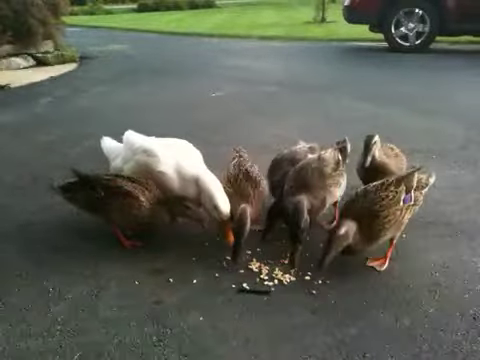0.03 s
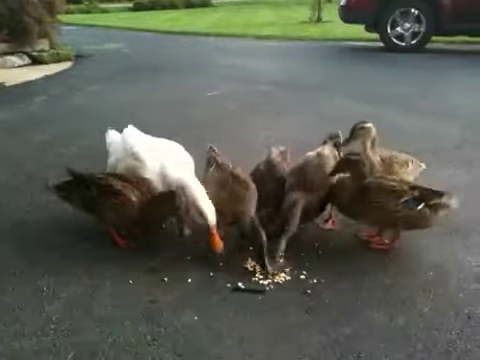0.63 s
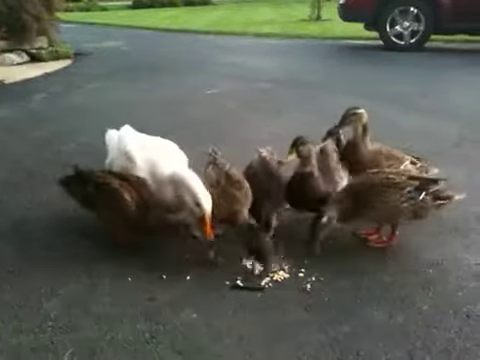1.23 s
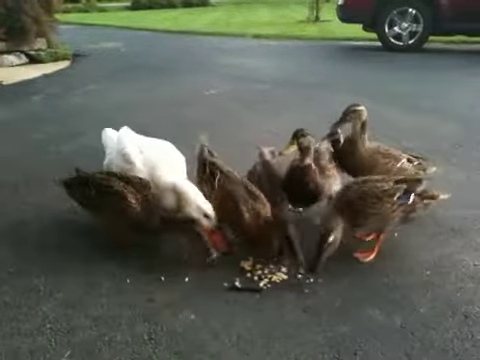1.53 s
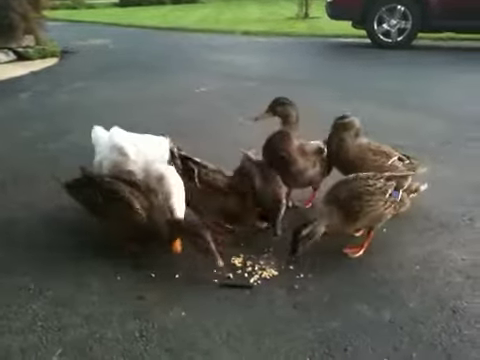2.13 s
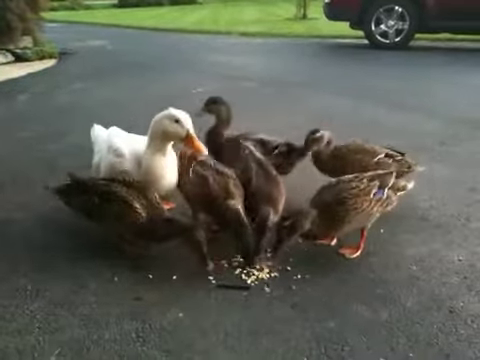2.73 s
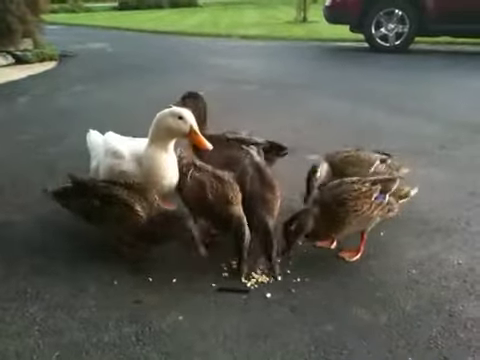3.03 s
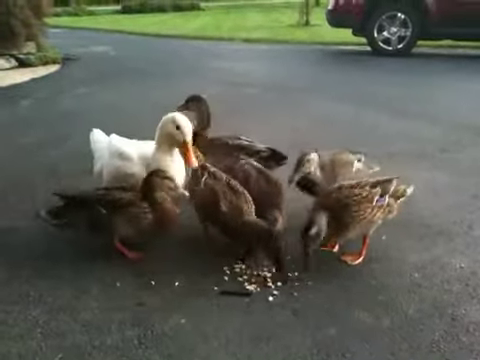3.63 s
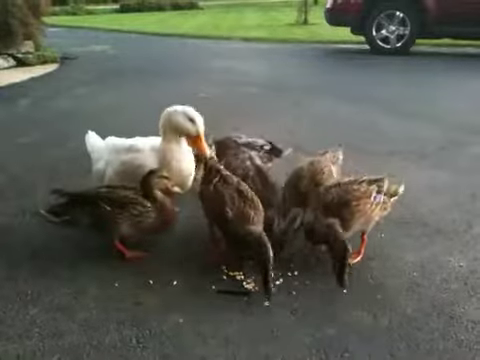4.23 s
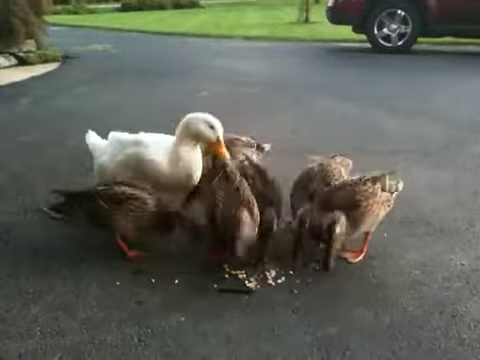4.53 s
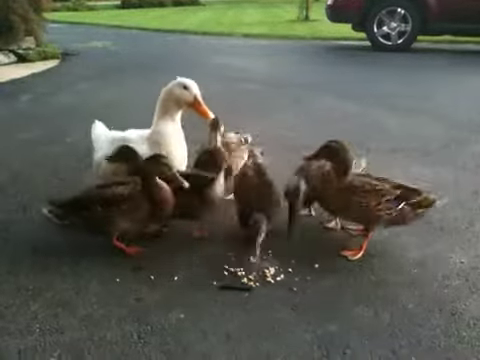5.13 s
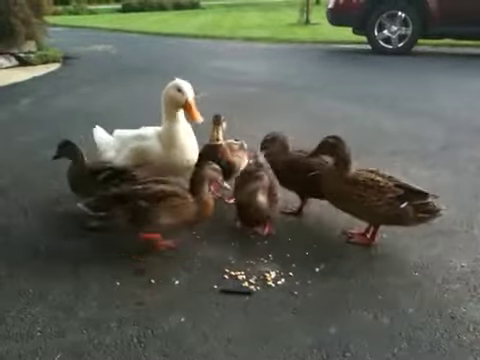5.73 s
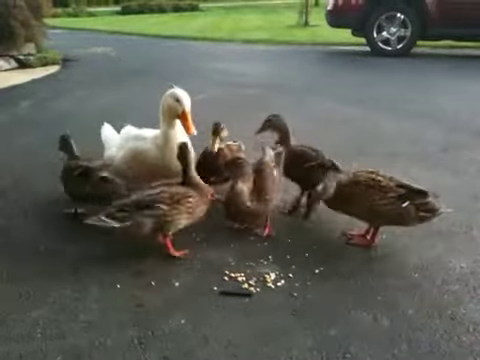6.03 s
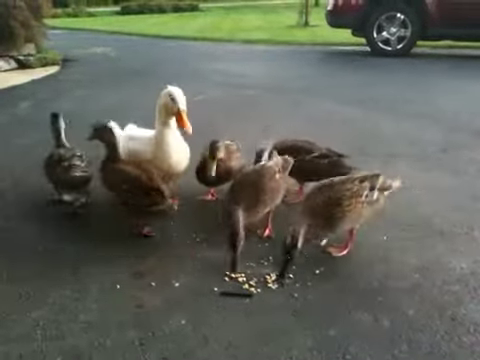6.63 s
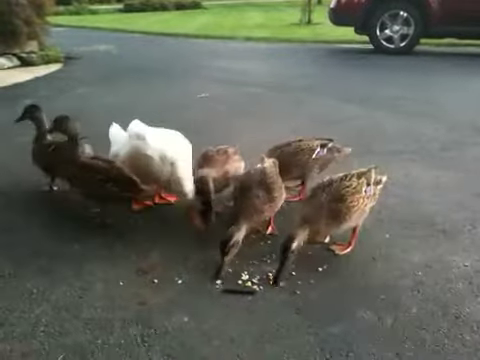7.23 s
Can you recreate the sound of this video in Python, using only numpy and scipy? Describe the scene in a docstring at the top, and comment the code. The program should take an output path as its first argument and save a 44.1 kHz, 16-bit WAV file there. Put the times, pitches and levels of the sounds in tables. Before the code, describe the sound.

Ducks peck at corn on pavement with short quacks and thin squeals, while a cricket chirps over a soft outdoor hum.

```python
"""On an asphalt driveway, young ducks crowd round corn a couple of metres away. Their voices are
breaking: the membranes of the syrinx whistle when taut and beat in pulses when slack, so a call slips
from a grunt through a thin squeal into a quack, shaped by the resonances of the throat. Impacts make
bills tick and clap, kernels skitter and grit crackle, and feathers rustle. A cricket chirps by
stridulation, and near the end a far engine picks up speed over quiet traffic."""
import sys
import numpy as np
from scipy import signal
from scipy.fft import rfft, irfft
from scipy.io import wavfile
from scipy.ndimage import map_coordinates

SR = 44100
rng = np.random.default_rng(int(sys.argv[2]) if len(sys.argv) > 2 else 0)


def file_out(sig):
    """Save sig as 16-bit WAV at sys.argv[1]."""
    # one column per channel
    cols = np.atleast_2d(sig).T
    # limit, then scale
    lim = np.clip(cols, -1, 1)
    pcm = np.round(lim * 32767).astype(np.int16)
    wavfile.write(sys.argv[1], SR, pcm)


N = 326340
T = np.arange(N) / SR

# Levels in the tables are relative; each source applies its own gain.
# Spectrum of the open air: f/Hz, density/dB
AIR_SPECTRUM = [(18, -79), (30, -39), (80, -11), (127, 0), (290, -10), (420, -19), (698, -16), (883, -19.5),
                (1210, -16.5), (2800, -25), (4040, -24.5), (5680, -18), (11200, -32.5), (14600, -25.5),
                (15800, -22)]
# Swell of distant traffic: t/s, level/dB
TRAFFIC_SWELL = [(0, -60), (1.2, -75.5), (2.2, -87), (3.7, -68), (4.3, -66), (5.2, -65.5), (5.8, -61),
                 (6.6, -67.5), (7.4, -72)]
# Vigour of the flock's feeding: t/s, level/dB
FEEDING_VIGOUR = [(0, 4.5), (.6, 6.5), (1.45, -2.5), (2, 1), (2.6, 6), (4.2, -2), (4.7, 5), (5.3, -0.5),
                  (5.7, -5), (6.5, -1), (7.4, 2.5)]
# Modes of a bill: f/Hz, bandwidth/Hz, gain/dB
BILL_MODES = [(1510, 4700, -16), (3200, 880, -3), (4300, 990, 4), (6110, 1680, -1), (7110, 500, 0.5)]
# Pulse trains: t/s, length/s, first rate/Hz, last rate/Hz, level/dB, fade/dB, step per lead-in pulse/dB,
# step per trailing pulse/dB, bill opening (0-1), formant scale, pinch gain/dB, edge gain/dB
QUACK_TRAINS = [(.0062, 0.0036, 231, 180, -29.5, -22, -9, -30, 0.65, 0.88, -2, -11),
                (0.118, 0.013, 249, 240, -26.5, -3.5, -11, -27, 0.3, 1.02, -3, -2),
                (0.397, 0.011, 174.3, 200, -27.5, -2, -41, -28, 0.53, 0.91, 1, -10),
                (2.5614, 0.014, 227.7, 231, -32.5, -6, -3.5, -14, 0.22, 0.99, -0.5, 3),
                (3.8348, 0.0097, 200.7, 195, -29.5, -2, -9, -19, 0.77, 0.99, 2, 1),
                (5.2088, 0.023, 132.5, 32.2, -26.5, -4.5, -6, -40, 0.87, 0.94, -5, -3.5),
                (5.4512, 0.023, 182, 172.7, -30.5, -3.5, -4.5, -0.5, 0.51, 0.997, 15, -11),
                (6.03, 0.016, 82.5, 71.6, -16, -7.5, -6.5, -5.5, 0.86, 0.98, 2, -1),
                (6.1887, 0.021, 227.2, 249.3, -14, 0, -3.5, -3.5, 0.87, 0.95, 2, 1.5),
                (6.3633, 0.043, 160.2, 62.6, -14.5, -18, -8.5, -16, 0.86, 0.993, 2, 6.5)]
# Very short pulse trains as the syrinx opens or shuts: t/s, level/dB, bill opening (0-1), formant scale
GRUNT_TRAINS = [(.06, -39, 0.46, 1), (0.8205, -35, .3, 0.97), (2.833, -45.5, 0.53, 0.59),
                (2.983, -39, 0, 0.95), (3.618, -35, 0.56, 0.99), (4.558, -38.5, 0.2, 0.97),
                (4.807, -44, 0.58, 0.52), (5.029, -38.5, 0.48, 1.1), (5.8233, -34, 0.55, 0.86)]
# Throat resonances with the bill shut, with it open, and for hissing: f/Hz, bandwidth/Hz, gain/dB
SHUT_FORMANTS = [(285, 56, 12), (799, 106, 6.5), (1150, 47, 3.5), (1970, 360, -0.5), (4830, 1330, -6.5)]
OPEN_FORMANTS = [(195, 39, 3.5), (620, 130, -13.5), (1246, 210, 11.5), (1380, 230, 10.5), (1600, 106, 2.5),
                 (1796, 110, 2.5), (3100, 250, -11), (3600, 260, -11), (4400, 250, -7.5), (5280, 290, -13),
                 (7100, 630, -36)]
HISS_FORMANTS = [(328, 200, 4), (1320, 460, 3), (1700, 460, 8.5), (2170, 270, 8), (2660, 280, 4.5),
                 (3420, 210, 4), (3770, 170, -3.5), (4400, 280, -1), (5670, 1500, 0)]
# Overtones of the whistling syrinx: harmonic number, level/dB
WHISTLE_OVERTONES = [(2, 3), (3, -13), (4, -14)]
# Falls of the breaking voice: t/s, length/s, first f/Hz, last f/Hz, level/dB
VOICE_BREAKS = [(0.097, 0.015, 1150, 748, -43), (0.554, 0.025, 1740, 1400, -56),
                (0.992, 0.02, 1045, 733, -46.5), (3.814, 0.019, 1420, 904, -55),
                (4.638, 0.019, 1057, 683, -45.5), (5.188, 0.013, 1480, 1075, -46),
                (6.007, 0.013, 1690, 890, -40), (6.167, 0.011, 1420, 900, -32.5),
                (6.346, 0.014, 1376, 822, -36.5)]
# Cricket chirps: t/s, level/dB
CRICKET_CHIRPS = [(.116, 8.5), (.728, 9), (2.445, 7), (2.853, 8), (3.521, 7.5), (3.919, 8), (4.467, 7.5),
                  (4.859, 9), (5.683, 7.5), (7.058, 7)]
# Wing strokes within a chirp: delay/s, level/dB
WING_STROKES = [(0, -8.5), (.037, -5), (.077, -6), (.12, -17.5)]
# The hardest pecks: t/s, level/dB, ring f/Hz, treble/dB
PECK_IMPACTS = [(0.194, -41, 4300, -33), (0.326, -49.5, 4000, -20), (0.388, -47, 3900, -7),
                (0.504, -49, 4400, -20), (.514, -44.5, 4000, 6), (0.56, -47, 3400, -20),
                (0.573, -39, 5200, -16), (0.6537, -41, 4060, -6), (.753, -47.5, 4200, -27),
                (0.992, -45.5, 3720, -14), (1.115, -46.5, 4540, -22), (1.139, -54, 4400, -20),
                (1.181, -50, 7900, 3), (1.2893, -55, 6400, 7), (1.3225, -50, 3870, -10),
                (1.342, -62, 5240, -12), (1.37, -54, 8980, 3), (1.3832, -52, 4340, -14),
                (1.3978, -46.5, 4240, -3), (1.42, -49, 5030, -14), (1.44, -51, 5700, -20),
                (1.4708, -55, 4680, -14), (1.482, -54, 4400, -5), (1.597, -64, 4020, -14),
                (1.6463, -53.5, 4400, -14), (1.685, -53, 4300, -15), (1.7405, -49.5, 4500, -28),
                (1.801, -52, 5970, -4), (1.836, -50.5, 4800, -10), (1.9138, -52, 4530, -6),
                (1.947, -53, 4390, -14), (1.988, -43, 3800, -29), (1.993, -47, 4760, -14),
                (2.001, -47.5, 7040, -1), (2.06, -48, 8000, 20), (2.088, -49, 4230, -20),
                (2.242, -50.5, 4030, -25), (2.2999, -58, 4680, -5), (2.326, -52, 4300, -2),
                (2.38, -48, 4700, -9), (2.4886, -40, 4530, -18), (2.537, -46.5, 5000, 5),
                (2.9111, -44.5, 5600, -10), (2.957, -45, 4200, -19), (2.9696, -40, 5130, -5),
                (3.0528, -47, 4760, -6), (3.1991, -46, 4000, -18), (3.242, -49, 4500, 3),
                (3.3481, -43.5, 4630, -4), (3.607, -47, 4830, -22), (3.841, -49, 4200, -21),
                (3.856, -42, 4700, -9), (3.873, -45.5, 4800, -9), (4.061, -52, 4200, -22),
                (4.085, -46, 4700, 10), (4.1758, -47.5, 4850, -16), (4.333, -51, 4800, -7),
                (4.398, -59, 3900, -20), (4.4068, -37, 7100, -33), (4.423, -49, 4960, -27),
                (4.4618, -42.5, 4900, -30), (4.498, -44.5, 4500, -27), (4.5586, -53, 5050, -12),
                (4.64, -42, 4130, -6), (4.686, -48, 5950, -19), (4.747, -55, 3600, -18),
                (4.771, -44, 5100, -14), (4.8094, -46.5, 5770, 4), (5.029, -47, 4800, 2),
                (5.343, -48, 5600, 2), (5.4903, -48.5, 4100, -6), (6.616, -48.5, 5700, -7),
                (6.8056, -41.5, 4900, -10), (6.881, -52, 4900, -18), (6.967, -50, 4600, -18),
                (7.035, -48, 4240, -20), (7.2649, -42.5, 4120, -15)]
# Arching whistles: t/s, length/s, first f/Hz, crest f/Hz, place of crest (0-1), level/dB, overtones/dB,
# breath/dB. The two sides of the syrinx may sound at once.
SQUEAL_NOTES = [(0.434, 0.13, 1600, 1890, 0.7, -48.5, -12, -33),
                (0.468, 0.094, 1657, 1725, 0.25, -63, 14, -20),
                (0.831, 0.19, 1520, 1900, 0.66, -53.5, -2, -37),
                (0.85, .138, 1575, 1648, 0.58, -70.5, 21.5, -20),
                (2.337, 0.029, 755, 930, 0.7, -65, -14, -21), (2.423, 0.096, 650, 678, 0.58, -61, -2, -10),
                (2.533, 0.057, 727, 735, 0.34, -51, -8, -22),
                (2.855, 0.033, 990, 1136, .7, -54.5, -24, -20),
                (2.921, 0.041, 990, 1067, 0.6, -53.5, -17, -16),
                (3.639, 0.18, 1330, 1600, 0.84, -47, -14, -21),
                (3.689, 0.022, 2020, 2207, 0.7, -48.5, -4, -22),
                (3.761, 0.042, 2086, 2170, 0.62, -48, -13, -6.5),
                (5.042, 0.037, 1296, 1680, .8, -57, -20, -11),
                (5.111, 0.11, 1353, 1616, 0.64, -51, -22, -19),
                (5.845, 0.23, 1334, 1740, 0.73, -44, -12.5, -30),
                (5.946, 0.067, 1500, 1510, 1, -62, 12.5, -15),
                (6.152, 0.026, 1540, 1570, 0.7, -48, -13, -12),
                (6.233, 0.089, 3330, 3370, 0.9, -61, -30, -16),
                (6.255, 0.081, 2490, 2590, 0.7, -55.5, -30, -22)]
# A bill clapping shut on a kernel: t/s, level/dB, ring f/Hz
BILL_CLAPS = [(1.141, -47.5, 697), (1.211, -52, 716), (1.482, -48.5, 1260), (1.834, -50, 1860),
              (2.144, -52, 501), (2.319, -48, 765), (2.499, -47, 680), (3.994, -45.5, 870),
              (4.698, -46, 770)]
# Feathers brushing: middle t/s, length/s, level/dB
FEATHER_BRUSHES = [(1.926, 0.082, -66), (2.655, 0.09, -56), (2.77, 0.55, -67.5), (3.07, .12, -87)]
# Dipping whistles: t/s, length/s, rim f/Hz, bottom f/Hz, level/dB, overtones/dB, breath/dB,
# roughness (0-1)
YELP_NOTES = [(2.363, 0.066, 728, 615, -54, -5.5, -24, 0.07), (2.876, 0.049, 910, 670, -47, -5, -19, 0),
              (3.21, 0.044, 1197, 903, -53.5, 2, -9, 0.56), (3.676, 0.02, 2220, 1667, -37.5, -7, -31, 0),
              (4.6, 0.037, 1120, 744, -39.5, -13, -25, 0), (5.079, 0.042, 1425, 1210, -41.5, -7, -32, 0.07),
              (5.882, 0.054, 767, 667, -45.5, -19, -14, 0.77)]


def undb(db):
    """Amplitude ratio of a level in decibels."""
    return 10 ** (np.asarray(db) / 20)


def unit(x):
    """Normalisation to a standard deviation of 1."""
    return x / (np.std(x) + 1e-12)


def level_at(rows, t=T):
    """Linear interpolation of a table of times and levels."""
    return np.interp(t, *np.transpose(rows))


def progress(length):
    """A ramp from 0 to 1 over length seconds."""
    return np.linspace(0, 1, int(length * SR))


def walk(rate, size=N):
    """Random wander of spread near 1, turning rate times a second."""
    knots = rng.standard_normal(4096)
    return map_coordinates(knots, [np.arange(size) * rate / SR], order=1, mode="mirror")


def phase_of(hz):
    """Phase is the time integral of frequency."""
    return 2 * np.pi * np.cumsum(hz) / SR


def add(out, s, x):
    """Superposition of x on out from time s."""
    i = int(round(s * SR))
    a, b = max(i, 0), min(i + len(x), N)
    if b > a:
        out[a:b] += x[a - i:b - i]


def band(x, low_hz, high_hz):
    """Band-pass filtering with skirts of 12 dB an octave."""
    edges_hz = [low_hz, min(high_hz, SR / 2 - 1000)]
    return signal.sosfilt(signal.butter(2, edges_hz, "band", fs=SR, output="sos"), x)


def ring(x, modes, scale=1):
    """Parallel resonances (f/Hz, bandwidth/Hz, gain/dB) of alternating sign, as along a tube."""
    out = 0
    for k, (hz, width, db) in enumerate(modes):
        b, a = signal.iirpeak(min(hz * scale, SR / 2 - 1000), hz / width, fs=SR)
        out = out + (-1) ** k * undb(db) * signal.lfilter(b, a, x)
    return out


def emphasis(x, hz, width_hz, db):
    """Peaking filter: one band is lifted or lowered."""
    return x + (undb(db) - 1) * ring(x, [(hz, width_hz, 0)])


def throat_dip(x, hz=2660, width_hz=1900):
    """Antiresonance of the throat between its two groups of formants."""
    return signal.lfilter(*signal.iirnotch(hz, hz / width_hz, fs=SR), x)


def echoes(x, t60_s, onset_s, low_hz, high_hz):
    """Reverberation: scattering from house, cars and trees builds up, then decays exponentially."""
    t = T[:SR]
    envelope = undb(-60 * t / t60_s) * (1 - np.exp(-(t / onset_s) ** 2))
    tail = band(rng.standard_normal(SR), low_hz, high_hz) * envelope
    return signal.fftconvolve(x, tail / np.linalg.norm(tail))[:N]


def open_air(level_db=-59.5):
    """Broadband noise: the open air is a nearly steady hiss, strongest in the bass."""
    hz, db = np.transpose(AIR_SPECTRUM)
    bin_hz = np.arange(N // 2 + 1) * SR / N
    colour = undb(np.interp(np.log(bin_hz + 1), np.log(hz), db))
    air = unit(irfft(rfft(rng.standard_normal(N)) * colour, N))
    return air * undb(level_db + .5 * walk(2.28))


def traffic():
    """Narrow-band noise: distant traffic is a low drone that slowly ebbs and swells."""
    return unit(band(rng.standard_normal(N), 106, 121.6)) * undb(level_at(TRAFFIC_SWELL) - 2)


def nibbling(count=420, spread_db=3.5, base_db=-57.5, decay_s=.0006):
    """Impact excitation: bills and skittering kernels tick at random, each with its pitch and weight."""
    out, t = np.zeros(N), T[:SR // 80]
    for when, size, pitch, weight in rng.random((count, 4)):
        s = when * N / SR
        contact = rng.standard_normal(len(t)) * np.exp(-t / decay_s)
        modes = ring(contact, BILL_MODES) + ring(contact, [(3300 * 3 ** pitch, 900, 2)])
        crack = undb(-10) * pitch * band(contact, 2400, 10700)
        knock = 2 * weight ** 2 * ring(contact, [(1110, 5900, -9)])
        tick = modes + crack + knock
        db = base_db + level_at(FEEDING_VIGOUR, s) + spread_db * min(-np.log(1 - size), 2)
        add(out, s, undb(db) * tick / np.abs(tick).max())
    return out


def grit(base_db=-73.5, grains_per_s=450, spread_db=4, flurry_db=3):
    """Shot noise: crumbs and grit crackle under the bills in flurries, louder with busier feeding."""
    grains = (rng.random(N) < grains_per_s / SR) * rng.standard_normal(N)
    grains *= undb(spread_db * np.minimum(rng.exponential(size=N), 3))
    crackle = unit(band(grains, 3900, 8500)) + undb(-9) * unit(band(grains, 880, 1950))
    return crackle * undb(base_db + level_at(FEEDING_VIGOUR) + flurry_db * walk(35))


def pulse_train(length, first_hz, last_hz, fade_db, lead_db, trail_db, jitter, lead_s=.0046):
    """Pulsed oscillation (t/s, level/dB): two pulses lead in, the run changes pace, two trail off."""
    pulses, at = [(-2 * lead_s, 2 * lead_db), (-lead_s, lead_db)], 0
    while at < length and len(pulses) < len(jitter):
        pulses.append((at, fade_db * at / length))
        period_s = np.interp(at, [0, length], [1 / first_hz, 1 / last_hz])
        at += (1 + jitter[len(pulses) - 1]) * period_s
    return pulses + [(at, fade_db + trail_db), (at + 1 / last_hz, fade_db + 2 * trail_db)]


def syrinx_slaps(count, db, opening, puff_s=.008):
    """Impulse and turbulence: each closure brings a puff of air; harder calls are raspier and brighter."""
    t = T[:SR // 30]
    puffs = rng.standard_normal((count, len(t))) * np.exp(-t / puff_s) * undb(.75 * (db + 1.5))
    rasp = (.25 + .037 * opening) * band(puffs, 1840, 24000)
    hoarseness = .04 * opening * band(puffs, 1150, 2800)
    impulse = t == 0
    corner_hz = np.clip(2600 * 2 ** ((db + 37.5) / 10), 1900, 9000)
    return band(throat_dip(rasp + hoarseness - impulse), 130, corner_hz)


def quacks(max_pulses=14, jitter=.025, shimmer_db=1, formant_spread=.018, formant_glide=.013):
    """Source and filter: in quacks and grunts, pulses of the syrinx ring an ever-shifting throat."""
    out = np.zeros(N)
    grunts = [(s, .0085, 193, 193, db, -14.5, -51, -51, opening, scale, 0, 0)
              for s, db, opening, scale in GRUNT_TRAINS]  # columns as in QUACK_TRAINS
    for call in list(QUACK_TRAINS) + grunts:
        s, length, first_hz, last_hz, db, *envelope_db, opening, scale, pinch_db, edge_db = call
        timing, swells, shifts = rng.standard_normal((max_pulses, 3)).T
        pulses = pulse_train(length, first_hz, last_hz, *envelope_db, jitter * timing)
        slaps = syrinx_slaps(max_pulses, db, opening)
        for (at, pulse_db), swell, shift, slap in zip(pulses, swells, shifts, slaps):
            glide = formant_glide * (np.clip(at / length, 0, 1) - .5)  # formants rise as the bill opens
            tuning = scale * (1 + formant_spread * shift + glide)
            voice = (1 - opening) * ring(slap, SHUT_FORMANTS, tuning)
            voice += opening * ring(slap, OPEN_FORMANTS, tuning)
            voice = emphasis(voice, 1790, 300, pinch_db)  # pinched throat
            voice = emphasis(voice, 4380, 900, edge_db)  # hard edge
            voice *= np.sqrt(.00054 * SR) / np.linalg.norm(voice)  # equal energy before the gain
            add(out, s + at, undb(db + pulse_db + shimmer_db * swell) * voice)
    return out


def hiss(lag_s=.0043, rise_db_per_s=1405, fall_db_per_s=515, flap_hz=65, wheeze_at_s=6.315):
    """Turbulence: air forced through the throat with each quack throbs as the slack membranes flap."""
    # air keeps flowing between the last two quacks
    wheeze = undb(-46) * np.exp(-(2 * (T - wheeze_at_s) / .17) ** 2)
    flow, loudest_db = wheeze, max(row[4] for row in QUACK_TRAINS)
    for s, _, _, _, db, *_ in QUACK_TRAINS:
        t = T - s - lag_s
        shape_db = np.maximum(np.minimum(rise_db_per_s * t, -fall_db_per_s * t), -120)
        flow = np.maximum(flow, undb(-34.5 + 1.28 * (db - loudest_db) + shape_db))
    flap = np.sin(phase_of(flap_hz * (1 + .076 * walk(40))))
    warble = np.sin(phase_of(5600 + 240 * (flap + .5 * walk(640))))  # thin tone on the wheeze
    air = unit(band(ring(rng.standard_normal(N), HISS_FORMANTS), 140, 5500))
    return (air * flow + undb(-5.5) * warble * wheeze) * (1 + .3 * flap)


def whistle(hz, db, overtone_db, breath_db, edge_s=.00029):
    """Self-sustained oscillation: a taut syrinx membrane whistles; the slacker it is, the hoarser."""
    n = len(hz)
    t = T[:n]
    waver_hz = 10 * 1600 / hz * walk(887, n)
    wander_hz = 22 * hz / 1600 * walk(52.1, n)
    phase = phase_of(hz + waver_hz + wander_hz)
    overtones = sum(undb(level + 4 * walk(111, n)) * np.sin(k * phase) for k, level in WHISTLE_OVERTONES)
    breath = undb(breath_db) * unit(band(rng.standard_normal(SR // 2), 1800, 3600))[:n]
    tone = np.sin(phase) + throat_dip(undb(overtone_db) * overtones) + breath
    edges = np.clip(np.minimum(t, t[-1] - t) / edge_s, 0, 1)
    envelope = undb(db + 2.2 * walk(49.3, n)) * edges
    flutter = 1 + .2 * walk(232, n)
    return tone * envelope * flutter


def voice_breaks(onset_db=-17):
    """Frequency falls with tension: the slackening whistle tumbles and swells, often into a quack."""
    out = np.zeros(N)
    for s, length, first_hz, last_hz, db in VOICE_BREAKS:
        u = progress(length)
        hz = first_hz * (last_hz / first_hz) ** u
        add(out, s, whistle(hz, db + onset_db * (1 - u) ** 2, overtone_db=-7.5, breath_db=-22))
    return out


def cricket(stroke_s=.025, base_db=-47, top_hz=5140, sag_hz=310, rise_hz_per_s=600, wall_s=.019):
    """Stridulation: each wing stroke is a scratchy tone that sags as the file slows; a wall reflects it."""
    out, t = np.zeros(N), np.arange(0, stroke_s, 1 / SR)
    n = len(t)
    for s, db in CRICKET_CHIRPS:
        chance = rng.standard_normal((len(WING_STROKES), 2))
        for (delay, stroke_db), (late, effort) in zip(WING_STROKES, chance):
            # the pitch climbs through the chirp as the wings press harder; the teeth catch unevenly
            hz = top_hz + rise_hz_per_s * delay - sag_hz * t / stroke_s + 50 * walk(110, n)
            phase = phase_of(hz) + .2 * walk(740, n)
            stroke = np.sin(np.pi * t / stroke_s) * np.sin(phase) * (1 + .2 * walk(793, n))
            stroke *= undb(base_db + db + stroke_db + .8 * effort + 1.8 * walk(164, n))
            start = s + delay + .001 * late - stroke_s / 2
            add(out, start, stroke)
            add(out, start + wall_s, undb(-9.5) * stroke)
    return out + undb(-4.2) * echoes(out, t60_s=.55, onset_s=.009, low_hz=1000, high_hz=14000)


def pecks(decay_s=.0009, bounce_s=.0025, scrape_s=.018, gain_db=7):
    """Impact and friction: a bill strikes the asphalt, a kernel rebounds, and the tip scrapes briefly."""
    out, t = np.zeros(N), T[:SR // 20]
    for s, db, hz, treble_db in PECK_IMPACTS:
        delay, squareness = rng.random(2)
        since_bounce = t - bounce_s * (.5 + 2 * delay)
        bounce = undb(-9) * (since_bounce > 0) * np.exp(-np.abs(since_bounce) / decay_s)
        scrape = undb(-26) * np.exp(-t / scrape_s)
        contact = (np.exp(-t / decay_s) + bounce + scrape) * rng.standard_normal(len(t))
        modes = ring(contact, BILL_MODES) + ring(contact, [(hz, 600, 0)])
        crack = undb(treble_db - 3) * band(contact, 5600, 11800)
        knock = 2 * squareness * ring(contact, [(1150, 2100, -13)])  # the hollow of the bill
        tick = modes + crack + knock
        add(out, s, undb(db + gain_db) * tick / np.abs(tick).max())
    return out


def squeals(sag=.092, onset_db=-6.5, end_db=-1.5, swell_share=.3):
    """Frequency follows tension: the pitch climbs ever more slowly to a crest, then sags as it lets go."""
    out = np.zeros(N)
    for s, length, first_hz, crest_hz, crest, db, overtone_db, breath_db in SQUEAL_NOTES:
        u, crest = progress(length), np.clip(crest, .1, .95)
        before = np.maximum(1 - u / crest, 0)
        after = np.maximum((u - crest) / (1 - crest), 0)
        hz = (crest_hz + (first_hz - crest_hz) * before ** 1.5) * (1 - sag * after ** 2)
        shape_db = onset_db * np.maximum(1 - u / swell_share, 0) + end_db * after
        add(out, s, whistle(hz, db + shape_db, overtone_db, breath_db))
    return out


def bill_claps(decay_s=.0048, width_hz=450, edge_db=-14):
    """Cavity resonance: the hollow of the bill knocks as it shuts, with a little of its hard edge."""
    out, t = np.zeros(N), T[:SR // 30]
    for s, db, hz in BILL_CLAPS:
        contact = rng.standard_normal(len(t)) * np.exp(-t / decay_s)
        knock = ring(contact, [(hz, width_hz, 0)]) + undb(edge_db) * ring(contact, BILL_MODES)
        add(out, s, undb(db) * knock / np.abs(knock).max())
    return out


def jostling():
    """Friction noise: feathered bodies push past each other with a soft, low rustle."""
    swell = sum(undb(db) * np.exp(-(2 * (T - s) / length) ** 2) for s, length, db in FEATHER_BRUSHES)
    return swell * unit(band(rng.standard_normal(N), 190, 510)) * undb(1.1 * walk(76))


def yelps(rim_db=-10, growl_hz=130):
    """A slacker membrane swings slower and wider: the note is lower and louder midway, and may growl."""
    out = np.zeros(N)
    for s, length, rim_hz, bottom_hz, db, overtone_db, breath_db, roughness in YELP_NOTES:
        rim = np.abs(2 * progress(length) - 1)  # 1 at both ends, 0 in the middle
        hz = bottom_hz + (rim_hz - bottom_hz) * rim ** 2.89
        hz += roughness * growl_hz * np.clip(walk(710, len(rim)), -2, 2)
        add(out, s, whistle(hz, db + rim_db * rim ** 2, overtone_db, breath_db))
    return out


def engine(start_s=6.35, firing_hz=85.3, climb_hz_per_s=19, fade_in_s=.52, swell_db_per_s=11.5):
    """Harmonics of a rising firing rate: a far vehicle accelerates, and only the low ones carry."""
    t = np.maximum(T - start_s, 0)
    phase = phase_of((firing_hz + climb_hz_per_s * t) * (1 + .006 * walk(25)))
    fundamental = undb(-72 + swell_db_per_s * t) * np.sin(phase)
    upper = np.sin(2 * phase) + undb(-14) * np.sin(3 * phase) + undb(-19) * np.sin(7 * phase)
    drone = fundamental + undb(-59) * upper
    return np.sqrt(2) * drone * undb(walk(24)) * np.minimum(t / fade_in_s, 1)


def scene():
    """Direct and reverberant sound add: ducks close by, with the thin echo of the yard behind them."""
    voices = quacks() + squeals() + yelps() + voice_breaks() + hiss()
    feeding = pecks() + bill_claps() + nibbling() + grit() + jostling()
    near_echo = undb(-15) * echoes(voices, t60_s=.2, onset_s=.004, low_hz=170, high_hz=8000)
    yard_echo = undb(-24) * echoes(voices, t60_s=.6, onset_s=.052, low_hz=1400, high_hz=4500)
    feeding_echo = undb(-14) * echoes(feeding, t60_s=.067, onset_s=.01, low_hz=1570, high_hz=9200)
    ducks = voices + feeding + near_echo + yard_echo + feeding_echo
    return (ducks + cricket() + engine() + open_air() + traffic())[None]


def record(dry):
    """Band limiting: a steep low-pass filter removes the highest treble."""
    return signal.sosfilt(signal.ellip(10, .2, 70, 15850, fs=SR, output="sos"), dry)


dry = scene()
out = record(dry)
file_out(out)
```